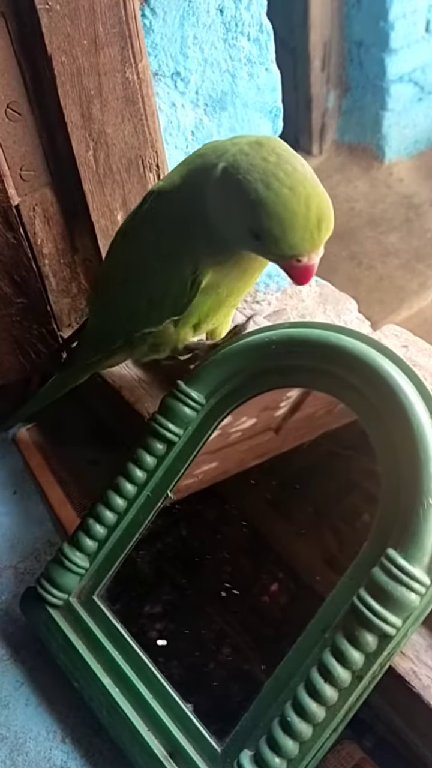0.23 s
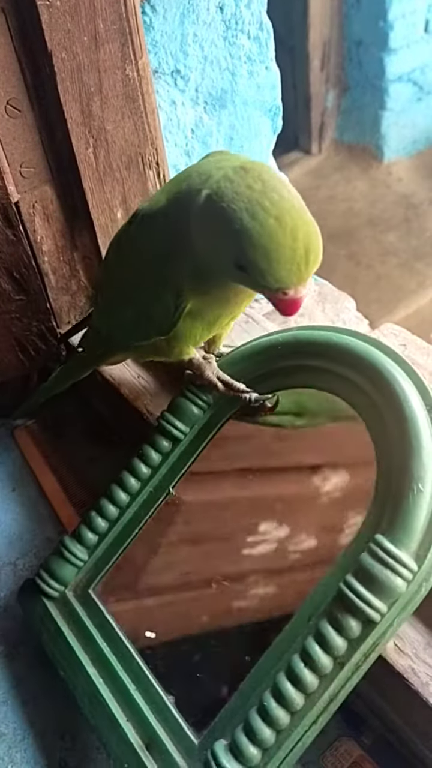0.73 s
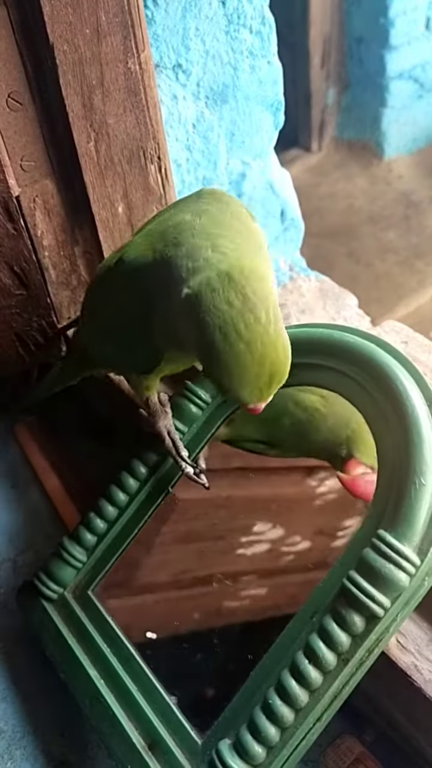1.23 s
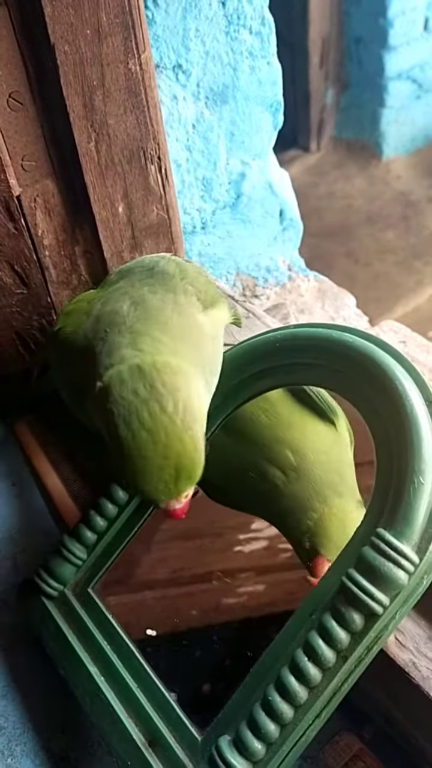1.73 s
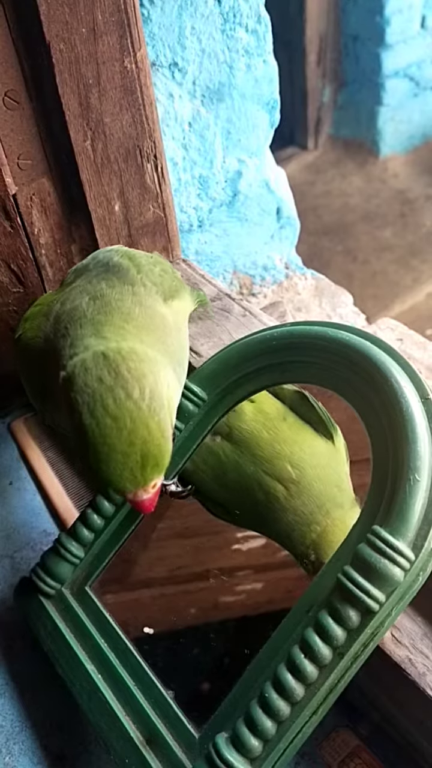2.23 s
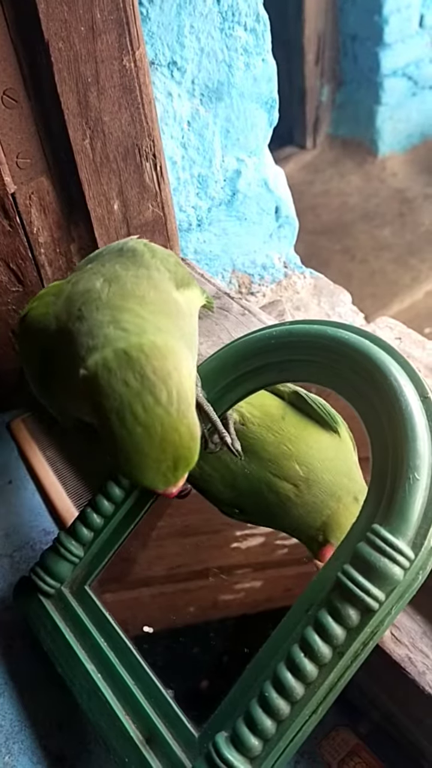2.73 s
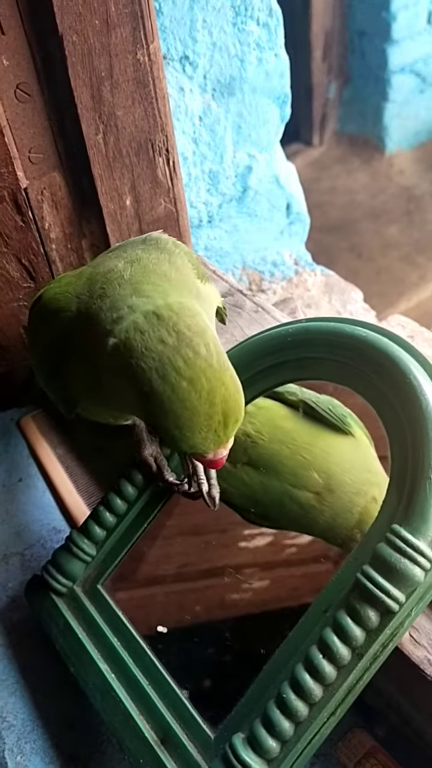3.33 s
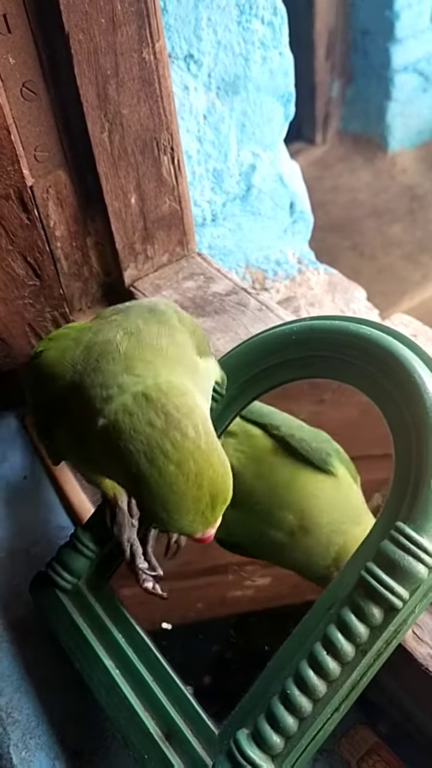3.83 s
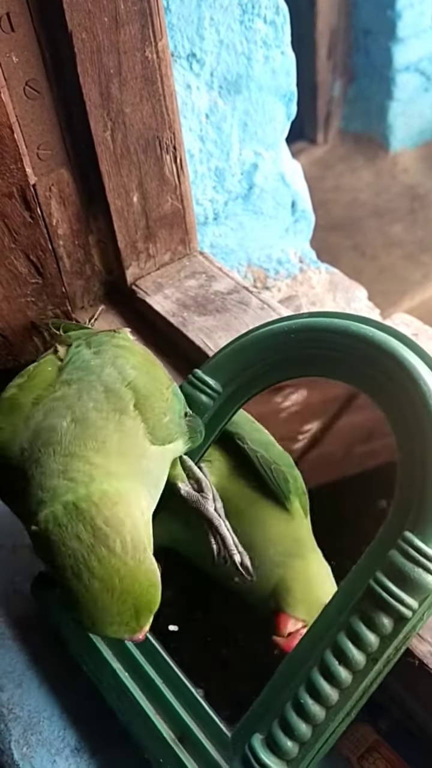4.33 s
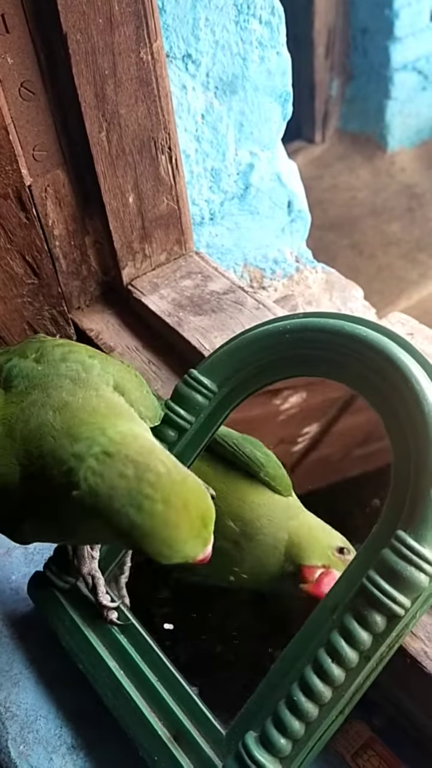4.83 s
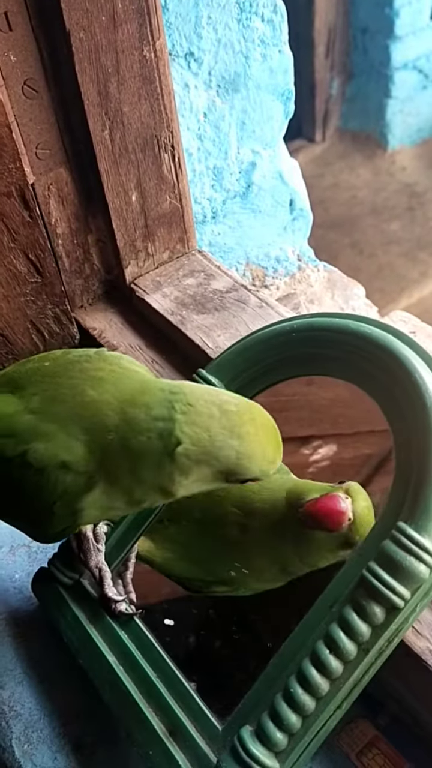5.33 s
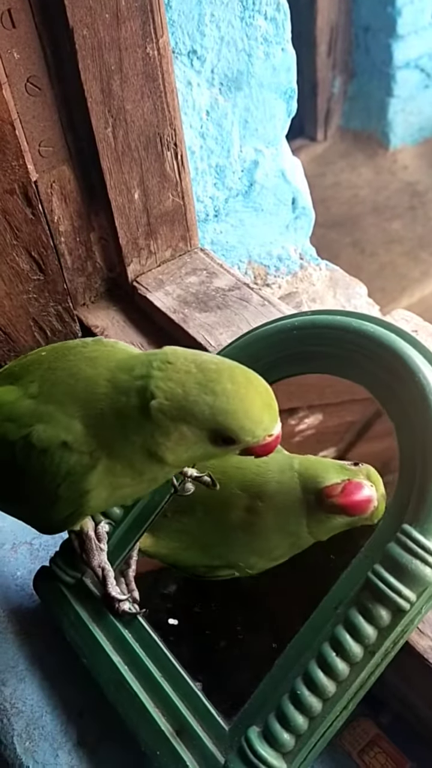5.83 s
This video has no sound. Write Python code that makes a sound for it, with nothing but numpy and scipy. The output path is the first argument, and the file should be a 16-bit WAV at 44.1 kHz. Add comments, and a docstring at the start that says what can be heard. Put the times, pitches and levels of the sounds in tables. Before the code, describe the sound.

Close up in a quiet, slightly resonant room, a parakeet clambers over a plastic-framed mirror. A light tap comes first, then dull foot knocks and a scrape, sparse clicks and tiny beak squeaks near two seconds. A sharp flurry of taps follows around four seconds, then it thins out. Low rumble, faint rush and thin hiss continue beneath, picked up by a phone.

```python
"""In a quiet room, a parakeet clambers over a plastic-framed hand mirror, close to a phone.
A low rumble from outside swells and hums in the room's resonances, under a faint rush and a high hiss.
Feet, beak and feathers rub: shaped noise with sharp snags. Beak and claws tap, knock and squeak:
short bursts of micro-slips ring the mirror's modes. The rocking frame thumps: brief low sine waves."""
import sys
import numpy as np
from scipy import signal
from scipy.fft import rfft, irfft, next_fast_len
from scipy.io import wavfile
from scipy.ndimage import uniform_filter1d, map_coordinates

SR = 44100
rng = np.random.default_rng(int(sys.argv[2]) if len(sys.argv) > 2 else 0)


def digitize_waveform(pressure):
    """Quantize a signal to 16-bit integers and store it at the path in sys.argv[1].

    Rows of a 2-D input are taken as channels; values are limited to [-1, 1].
    """
    field = np.atleast_2d(pressure).T
    bounded = np.clip(field, -1, 1)
    quanta = np.round(bounded * 32767).astype(np.int16)
    wavfile.write(sys.argv[1], SR, quanta)


N = 268524  # length in samples

# Resonances of the room. Each row: pitch in Hz, width in Hz, lift in dB.
ROOM_RESONANCES = [(91, 35, 7.5), (134, 16, 5.5), (186.2, 6.6, 6.5), (250.2, 4.3, 11.5), (308, 40, 5),
                   (357, 17, 4.5), (671, 60, 7.5), (802, 54, 5.5), (868, 55, 9)]
# How long the room's echo lasts. Each row: frequency in Hz, time to die by 60 dB in seconds.
ECHO_TIMES = [(300, 0.89), (2500, 0.2), (8000, 0.79)]
ROOM_DULL_HZ = 5500  # the walls return little above this

# Tone of the rumble. Each row: frequency in Hz, relative level in dB per Hz.
RUMBLE_TONE = [(25, -57.5), (50, -42), (70, -29), (100, -19), (145, -10.5), (170, 1.5), (230, -0.5),
               (300, -1.5), (390, -4), (480, -16.5), (800, -35.5), (2000, -64.5)]
# Tone of the deep drone under it. Each row: frequency in Hz, relative level in dB per Hz.
DRONE_TONE = [(25, -35), (48, -22.5), (65, -1.5), (95, -3), (130, -4), (180, -43.5)]
# Slow drift of the rumble. Each row: time in seconds, level in dB before the rumble's gain.
RUMBLE_DRIFT = [(0, -50), (.2, -52), (.4, -48.5), (.56, -50), (.76, -44.5), (1.03, -49.5), (1.1, -46.5),
                (1.3, -54.5), (1.85, -51), (2.2, -49), (2.42, -52), (2.64, -49.5), (3.1, -54), (4.55, -52),
                (5.44, -46.5), (5.52, -42.5), (5.67, -42.5), (5.76, -36), (5.88, -42), (6.09, -46)]
# Short low surges. Each row: strongest moment in seconds, fall in seconds,
# rumble level in dB before the rumble's gain, drone level in dB.
LOW_SURGES = [(1.469, 0.25, -47, -80), (1.963, 0.13, -42.5, -53.5), (2.728, 0.038, -42, -71),
              (3.46, 0.088, -47, -59), (4.671, 0.063, -45, -49.5), (4.85, 0.078, -48, -72),
              (5.042, 0.02, -43.5, -67)]
SURGE_RISE_S = 0.039
DRONE_FOLLOWS = 0.41  # dB of drone per dB of rumble drift

# Tone of the background rush. Each row: frequency in Hz, relative level in dB per Hz.
RUSH_TONE = [(290, -29.5), (520, -8.5), (850, -13.5), (1150, -9), (1420, -9.5), (1750, -21), (2750, -29),
             (4000, -46.5)]
# The rush swells and sinks. Each row: time in seconds, level in dB before the rush's gain.
RUSH_DRIFT = [(.11, -53), (.33, -63.5), (.55, -59), (.93, -61.5), (1.36, -54), (1.48, -60), (1.64, -58),
              (1.83, -62.5), (2.1, -75.5), (2.26, -54), (2.43, -69), (2.62, -55), (3.08, -62), (3.21, -55),
              (3.44, -59), (3.6, -54.5), (3.73, -59.5), (4.56, -56.5), (5.12, -54), (5.47, -56.5),
              (5.81, -48.5), (5.93, -58.5), (6.06, -52)]
# Tone of the rush's upper band. Each row: frequency in Hz, relative level in dB per Hz.
UPPER_TONE = [(1600, -30), (1980, -4), (2100, -6), (2250, 5), (2460, -2.5), (2700, -30.5), (3500, -56)]
# The upper band swells and sinks. Each row: time in seconds, level in dB before its gain.
UPPER_DRIFT = [(0, -57.5), (.42, -68), (.62, -64), (.88, -69.5), (1.03, -65), (1.66, -66.5), (1.81, -71.5),
               (2.1, -71.5), (2.6, -64), (2.79, -65.5), (3.0, -66.5), (3.38, -62.5), (4.7, -63.5),
               (4.94, -71.5), (5.07, -60), (5.24, -68), (5.38, -61.5), (5.8, -62.5), (6.09, -74)]
# Tone of the high hiss. Each row: frequency in Hz, relative level in dB per Hz.
FIZZ_TONE = [(1500, -22.5), (2750, -0.5), (3300, 1.5), (4050, 1.5), (4550, 3), (5250, -5.5), (6150, -8),
             (6600, 5), (7100, -0.5), (7600, -3)]

# Rubs of foot, beak and feathers. Each row: strongest moment in seconds, rise in seconds, level in dB,
# centre in Hz, spread in octaves, crackle in dB over the rub.
RUBS = [(0.049, 0.037, -57, 2000, 2.7, -4), (0.218, 0.021, -54.5, 3000, 1.7, -20),
        (0.757, 0.03, -45, 620, 0.96, -3), (1.128, 0.05, -47, 1284, 1.06, -2),
        (1.17, 0.093, -57.5, 7350, 1.2, -15), (1.564, 0.026, -56.5, 2000, 2, -0.5),
        (1.977, 0.062, -52, 2070, 0.94, -1), (2.12, 0.11, -63.5, 6430, 0.77, -20),
        (2.92, 0.19, -62.5, 5700, 0.69, -25), (3.351, 0.12, -62, 6170, 1.3, -23),
        (3.594, 0.056, -58, 2960, 1.3, -13.5), (3.79, 0.011, -56, 5430, 0.99, -11),
        (3.893, 0.069, -45.5, 1670, 1.27, -3), (4.264, 0.046, -48, 1010, 2.2, 5),
        (4.634, 0.034, -54.5, 3900, 2.1, -6), (5.6, 0.035, -59, 3000, 1.8, 0)]
STROKE_FALL = 1.43  # a rub's fall time over its rise time
SNAGS_PER_S, SNAG_SCATTER_DB = 190, 3.5  # claws and quills catch on the ribbed frame
TOP_HZ = 8550  # band limit

# Ringing of mirror and frame. Each row: pitch in Hz, width in Hz, strength in dB.
MIRROR_MODES = [(810, 810, 6.5), (1025, 360, 8), (1398, 260, 6), (1778, 180, 2.5), (2014, 280, 5),
                (2343, 710, 2), (2945, 530, 0), (3480, 460, 0.5), (3935, 260, -1), (4560, 600, -4.5),
                (5110, 490, -8), (5903, 170, -10), (6933, 500, -7.5), (7520, 960, -12)]
LOW_CUT_HZ = 860  # so small a panel radiates little of a blow below this
RING_DB, RING_WIDTH_HZ = 12, 140  # each point of contact favours one mode

# Taps of beak and claw tips on the mirror. Each row: start in seconds, body in dB before the blows' gain,
# centre in Hz, spread in octaves, tip tick in dB before that gain, skid in seconds, favoured mode in Hz.
TIP_TAPS = [(0.1885, -33.5, 2030, 0.71, -37, 0.00049, 2330), (.589, -56, 2530, 0.49, -60, 0.0062, 3890),
            (1.029, -51.5, 2500, 0.39, -57.5, 0.00091, 2380),
            (1.5455, -38.5, 2000, 0.88, -52.5, 0.0015, 2330), (2.0715, -41.5, 2600, 0.3, -39, 0.002, 4120),
            (2.454, -60, 3100, .4, -57.5, 0.0022, 5880), (3.0114, -62, 4300, 0.35, -56.5, 0.00067, 5880),
            (3.558, -47, 2870, 0.38, -42.5, 0.003, 5740), (3.8127, -53.5, 3220, 0.77, -52, 0.0009, 3570),
            (3.8592, -41, 2400, 0.35, -62, 0.00075, 2360), (3.876, -38.5, 3220, 0.71, -38.5, 0.0027, 5230),
            (3.8802, -34.5, 2830, 0.42, -37, 0.0024, 3300),
            (3.888, -37.5, 2850, 0.75, -57.5, 0.00033, 3980), (3.9045, -50, 2900, 0.66, -51, 0.0014, 2380),
            (4.008, -36, 3500, 0.6, -67, .0012, 3456), (4.0108, -20.5, 3140, 0.53, -31.5, 0.00097, 1050),
            (4.189, -48, 3230, 0.25, -57, 0.0023, 7600), (4.2018, -35.5, 2900, 0.63, -65, 0.0014, 980),
            (4.2232, -32, 2410, 0.79, -46.5, 0.00099, 1880), (4.251, -41.5, 3200, .5, -52, 0.0059, 3400),
            (4.279, -43, 3000, 0.81, -42.5, 0.0037, 5800), (4.2905, -52.5, 2700, 0.88, -54.5, 0.0029, 2880),
            (4.378, -35.5, 3100, 0.46, -39, 0.0002, 6860), (4.456, -40.5, 3200, 0.57, -44.5, 0.00027, 3550),
            (4.554, -58, 4180, 0.51, -60, 0.00073, 5200), (4.5855, -49, 3800, 0.77, -57, 0.00083, 5100),
            (4.609, -50, 3360, 0.91, -48, 0.00024, 5830), (4.65, -43.5, 2500, 1.3, -59, 0.0027, 2070)]
# Dull knocks of a foot on the plastic frame. Each row: start in seconds, body in dB before the blows' gain,
# centre in Hz, spread in octaves, favoured mode in Hz.
FOOT_KNOCKS = [(0.7287, -34, 900, 1.1, 945), (.7325, -37, 800, 1.34, 680), (0.7600, -38, 960, 1.34, 970),
               (1.114, -44, 1380, 0.69, 1060), (4.2601, -34.5, 1360, 0.51, 790),
               (4.2655, -41.5, 736, 0.45, 600), (5.334, -51.5, 890, 0.88, 680)]
KNOCK_TICK_DB, KNOCK_SKID_S = -40, 0.00046  # tip tick relative to the body; skid time
# The beak catches and squeaks. Each row: start in seconds, body in dB before the blows' gain, pitch in Hz.
BEAK_SQUEAKS = [(0.284, -47, 2530), (1.907, -46, 2170), (1.939, -59, 2380), (1.9542, -42.5, 2340),
                (1.969, -46, 2330), (1.976, -39.5, 2370), (2.017, -56, 2340), (2.03, -42, 2370),
                (2.038, -47, 2480)]
SQUEAK_SPREAD, SQUEAK_TICK_DB, SQUEAK_SKID_S = 0.22, -18, 0.0019  # octaves; relative to the body; skid time

# The mirror rocks on its support. Each row: start in seconds, peak in dB, pitch in Hz.
ROCKING_THUMPS = [(0.276, -44, 292), (0.72, -35, 256), (0.755, -50, 253), (3.813, -36.5, 186),
                  (3.837, -41, 246), (4.264, -36.5, 319)]


def amp(db):
    """Turn decibels into a gain."""
    return 10 ** (np.asarray(db) / 20)


def unit(x):
    """Scale to an average strength (rms) of 1."""
    return x / np.sqrt(np.mean(x ** 2) + 1e-20)


def along(points, hz):
    """Read a value between (Hz, value) points, on a log frequency axis."""
    f, v = np.transpose(points)
    return np.interp(np.log(hz + 1), np.log(f + 1), v)


def curve(rows):
    """Join (seconds, value) rows into one value per sample."""
    return np.interp(np.arange(N) / SR, *np.transpose(rows))


def wobble(rate):
    """A smooth random curve with this many random points a second."""
    points = rng.standard_normal(N // 100)
    return map_coordinates(points, [np.arange(N) * rate / SR], mode="mirror")


def swell(s, rise, fall):
    """A soft rise to 1 at time s, then an exponential fall."""
    t = np.arange(N) / SR
    return np.exp(-np.where(t < s, ((s - t) / rise) ** 2, (t - s) / fall))


def filtered(x, response):
    """Multiply the frequencies of x by a response."""
    m = next_fast_len(N + SR // 2)  # room for the filter's tail
    return irfft(rfft(x, m) * response(np.fft.rfftfreq(m, 1 / SR)), m)[:N]


def add(track, s, sound):
    """Mix a sound into the track at time s."""
    part = track[round(s * SR):][:len(sound)]
    part += sound[:len(part)]


def patchy_noise(patchy_db):
    """White noise whose level drifts in patches of time and frequency."""
    z = signal.stft(rng.standard_normal(N), nperseg=1024)[2]
    field = uniform_filter1d(rng.standard_normal(z.shape), size=4, axis=0)
    field = uniform_filter1d(field, size=10, axis=1)
    return signal.istft(z * amp(patchy_db * unit(field)), nperseg=1024)[1][:N]


def room_lift(f):
    """Decibels that the room's resonances add at each frequency."""
    return sum(db / (1 + (2 * (f - hz) / width) ** 2) for hz, width, db in ROOM_RESONANCES)


def in_room(spectrum, patchy_db):
    """Restless noise of rms 1 with this tone, lifted at the room's resonances."""
    noise = patchy_noise(patchy_db)
    return unit(filtered(noise, lambda f: amp(along(spectrum, f) + room_lift(f))))


def hum(level_db=2.2, drone_db=-64):
    """Low noise: the rumble drifts and surges, and a deeper drone follows its drift more gently."""
    drift_db = curve(RUMBLE_DRIFT)
    rumble = amp(drift_db)
    drone = amp(drone_db + DRONE_FOLLOWS * (drift_db - drift_db.mean()))
    for s, fall, db, deep_db in LOW_SURGES:
        surge = swell(s, SURGE_RISE_S, fall)
        rumble = np.hypot(rumble, amp(db) * surge)
        drone = np.hypot(drone, amp(deep_db) * surge)
    noise = in_room(RUMBLE_TONE, patchy_db=3.5)
    # even out the noise, so that drift and surges alone set the rumble's slow level
    slow_power = np.abs(uniform_filter1d(noise ** 2, size=SR // 14))
    steady = noise / np.sqrt(slow_power)
    return amp(level_db) * rumble * steady + drone * in_room(DRONE_TONE, patchy_db=6.0)


def air(level_db=-2.5, upper_db=-1.0, waver_db=2.0, waver_rate=12, fizz_db=-69.0, fizz_drift_db=1.3):
    """Noise of the surroundings: a rush swells in two separate bands, under a slowly drifting high hiss."""
    rush = in_room(RUSH_TONE, patchy_db=3.5)
    upper = in_room(UPPER_TONE, patchy_db=2.8)
    fizz = in_room(FIZZ_TONE, patchy_db=4)
    rush_gain = amp(curve(RUSH_DRIFT) + level_db + waver_db * wobble(waver_rate))
    upper_gain = amp(curve(UPPER_DRIFT) + upper_db + waver_db * wobble(waver_rate))
    fizz_gain = amp(fizz_db + fizz_drift_db * wobble(waver_rate / 2))
    return rush_gain * rush + upper_gain * upper + fizz_gain * fizz


def mirror(f, between_db=-11, core_hz=55):
    """How strongly the mirror radiates: modes, each with a longer-ringing core, over a weak broad response."""
    power = 0
    for hz, width, db in MIRROR_MODES:
        mode = 1 / (1 + (2 * (f - hz) / width) ** 2) ** 2
        core = 1 / (1 + (2 * (f - hz) / core_hz) ** 2) ** 2
        power = power + amp(db) ** 2 * (mode + core)
    broad = f / (f + 600) / (1 + (f / 4200) ** 4)
    return np.sqrt(power + amp(between_db) ** 2 * broad)


def strokes(grain_db=-0.5, grain_rate=330, direct_db=-9, catch_db=1.3, catch_rate=80):
    """Friction is tiny slips and sharper snags that catch unevenly, partly heard through the mirror's modes."""
    t = np.arange(N) / SR
    slips = np.interp(t * grain_rate, np.arange(N), rng.standard_normal(N))
    unevenness_db = grain_db * slips + catch_db * wobble(catch_rate)
    rough = unit(patchy_noise(patchy_db=2.5) * amp(unevenness_db))

    snag_here = rng.random(N) < SNAGS_PER_S / SR
    snag_sign = np.sign(rng.standard_normal(N))
    snags = unit(snag_here * snag_sign * amp(SNAG_SCATTER_DB * rng.standard_normal(N)))

    def heard(f):
        return (mirror(f) + amp(direct_db)) * (f < TOP_HZ)

    friction, crackle = filtered(rough, heard), filtered(snags, heard)
    out = np.zeros(N)
    for s, rise, db, hz, spread, crackle_db in RUBS:
        rub = filtered(friction + amp(crackle_db) * crackle,
                       lambda f: np.exp(-.5 * (np.log2((f + 1) / hz) / spread) ** 2))
        out += amp(db) * swell(s, rise, STROKE_FALL * rise) * unit(rub)
    return out


def reach(f, hz, spread):
    """The range of frequencies that a contact excites, spread in octaves around hz."""
    return 1 / (1 + (np.log2((f + 1) / hz) / (2 * spread)) ** 2) ** 2


def causal(gain):
    """The ring with this spectrum that puts its energy as early as possible (minimum phase)."""
    cepstrum = irfft(np.log(np.maximum(gain, 1e-6)))
    half = len(cepstrum) // 2
    # fold the backward half of time onto the forward half
    fold = np.concatenate([[1], np.full(half - 1, 2), [1], np.zeros(half - 1)])
    return irfft(np.exp(rfft(cepstrum * fold)))


def contact(db, hz, spread, tick_db, ring_hz, tick_hz=6900):
    """One blow: the mirror rings around the contact's pitch, one mode stands out, and the hard tip ticks."""
    f = np.fft.rfftfreq(4096, 1 / SR)
    favoured = np.sqrt(1 + amp(RING_DB) ** 2 / (1 + (2 * (f - ring_hz) / RING_WIDTH_HZ) ** 2))
    low_cut = f ** 2 / np.hypot(f ** 2, LOW_CUT_HZ ** 2)
    panel = mirror(f) * favoured * low_cut
    body = amp(db) * unit(panel * reach(f, hz, spread))
    tick = amp(tick_db) * unit(panel * reach(f, tick_hz, 1 / 3))
    return causal(np.hypot(body, tick))


def skid(duration, scatter_db=-7, delay=0.0034, width=0.004, evenness=0.8):
    """A contact is a quick run of micro-slips, plus its scatter off the door frame and sill (times in s)."""
    t = np.arange(SR // 20) / SR
    slips = unit(rng.standard_normal(len(t)) * t * np.exp(-t / duration))
    echoes = unit(rng.standard_normal(len(t)) * np.exp(-np.abs(t - delay - duration) / width))
    spectrum = rfft(slips + amp(scatter_db) * echoes)
    # a small hard tip feeds all frequencies about evenly
    force = irfft(spectrum / np.abs(spectrum) ** evenness)[:SR // 40]
    return force / np.linalg.norm(force)


def room_tail():
    """A fresh diffuse echo of energy 1, its treble dulled and each frequency dying at its own rate."""
    hz, t, z = signal.stft(rng.standard_normal(SR // 3), SR, nperseg=256)
    z = z / np.hypot(1, (hz[:, None] / ROOM_DULL_HZ) ** 2)
    decay = amp(-60 * t / along(ECHO_TIMES, hz)[:, None])
    tail = signal.istft(z * decay, SR, nperseg=256)[1]
    return tail / np.linalg.norm(tail)


def struck(ring, skid_s, level_db=22, wet_db=-18):
    """A ring set off by a skidding contact, with the room's short answer."""
    direct = amp(level_db) * signal.fftconvolve(ring, skid(skid_s))
    sound = amp(wet_db) * signal.fftconvolve(direct, room_tail())
    add(sound, 0, direct)
    return sound


def taps():
    """Every tap, knock and squeak is a skidding contact that rings the mirror."""
    blows = list(TIP_TAPS)
    for s, db, hz, spread, ring_hz in FOOT_KNOCKS:
        blows.append((s, db, hz, spread, db + KNOCK_TICK_DB, KNOCK_SKID_S, ring_hz))
    for s, db, hz in BEAK_SQUEAKS:
        blows.append((s, db, hz, SQUEAK_SPREAD, db + SQUEAK_TICK_DB, SQUEAK_SKID_S, hz))
    out = np.zeros(N)
    for s, db, hz, spread, tick_db, skid_s, ring_hz in blows:
        ring = contact(db, hz, spread, tick_db, ring_hz)
        add(out, s, struck(ring, skid_s))
    return out


def thumps(rise=0.0099):
    """The bird's shifting weight bumps the frame against the wood: a few low cycles (rise in s)."""
    out, t = np.zeros(N), np.arange(SR // 8) / SR
    push = (t / rise * np.exp(1 - t / rise)) ** 2
    for s, db, hz in ROCKING_THUMPS:
        add(out, s, amp(db) * push * np.sin(2 * np.pi * hz * t))
    return out


def scene():
    """The bird on the mirror over the room's background."""
    return (hum() + air() + strokes() + taps() + thumps())[None]


def record(dry):
    """The phone rolls off just under its band limit and keeps nothing above."""
    roll_off = [(7550, -2.0), (8000, -14.0), (8450, -21.0)]  # (Hz, dB)
    return filtered(dry[0], lambda f: amp(along(roll_off, f)) * (f < TOP_HZ))[None]


dry = scene()
out = record(dry)
digitize_waveform(out)
```